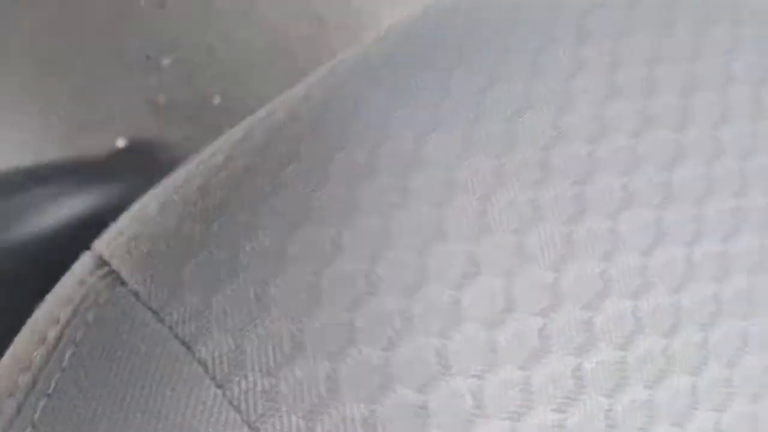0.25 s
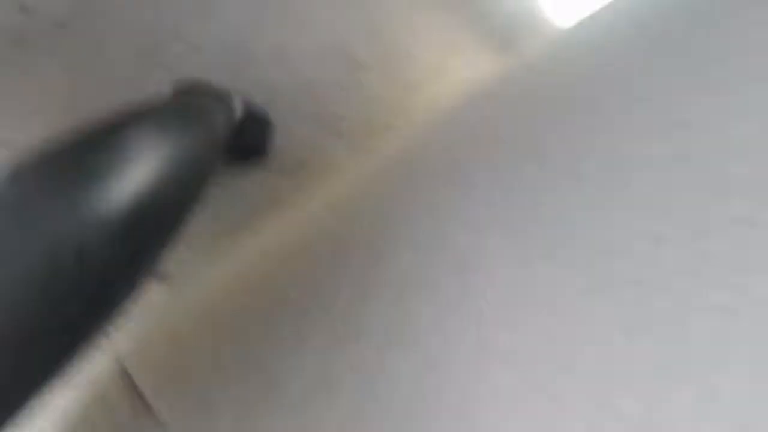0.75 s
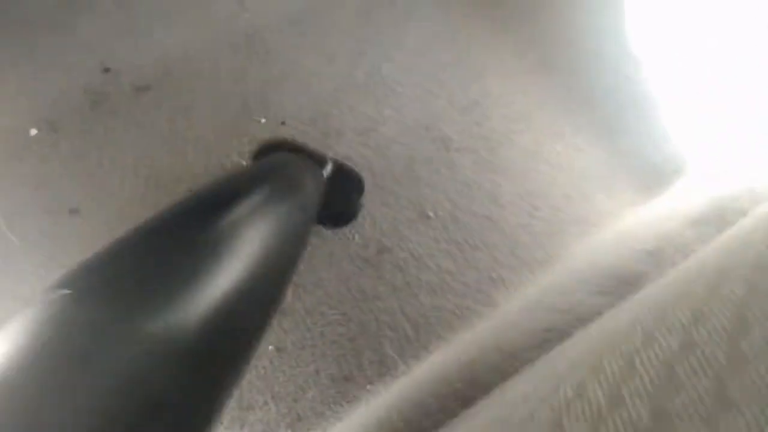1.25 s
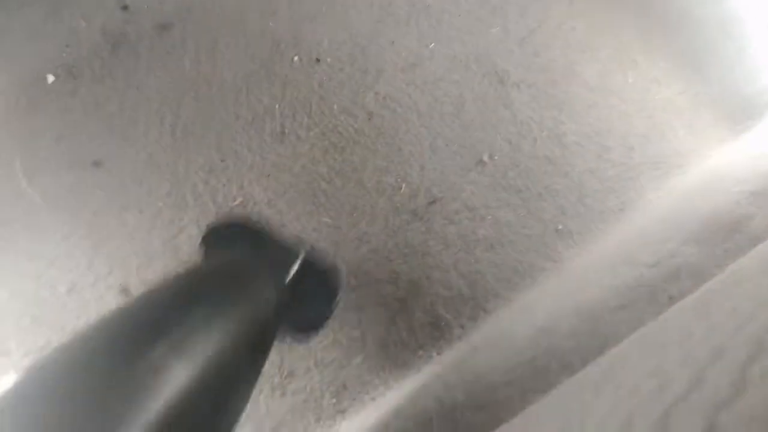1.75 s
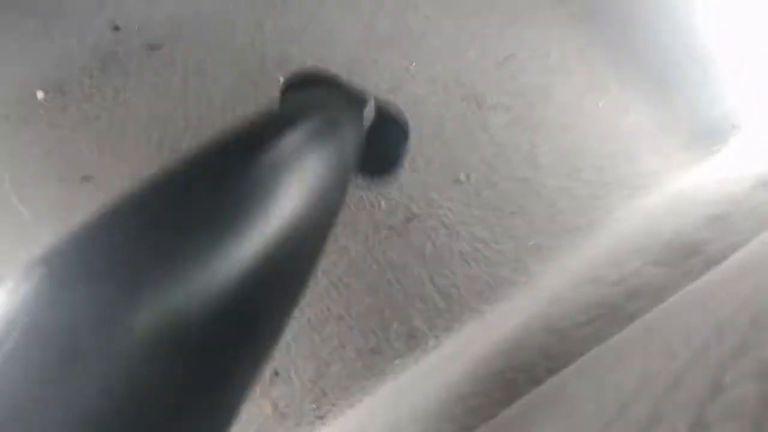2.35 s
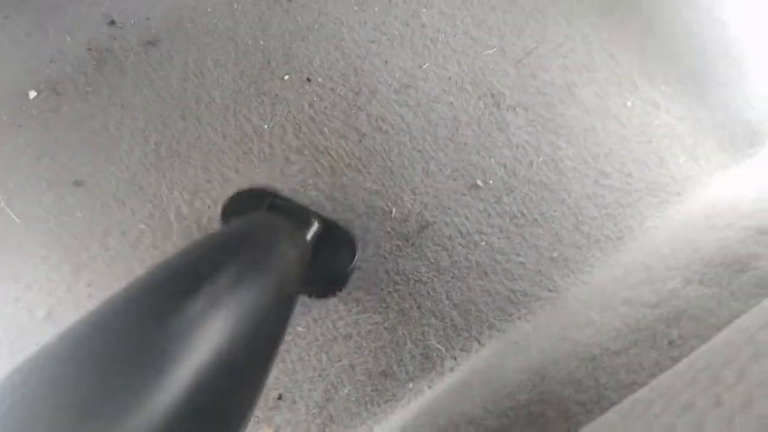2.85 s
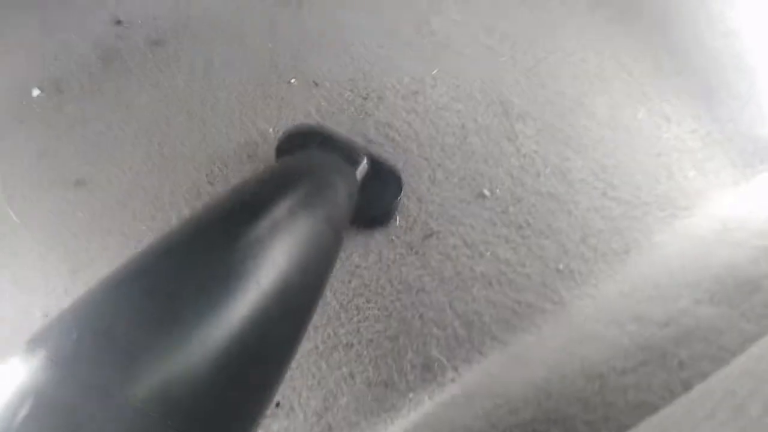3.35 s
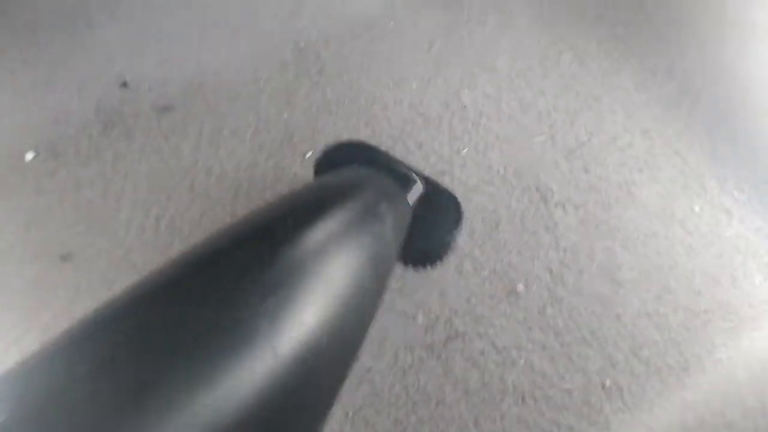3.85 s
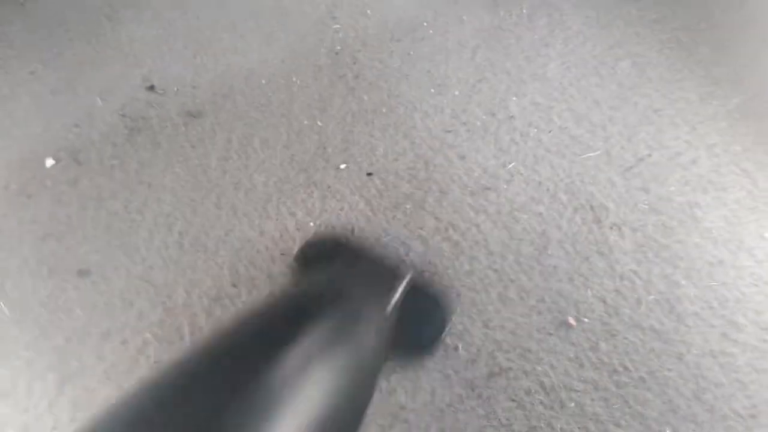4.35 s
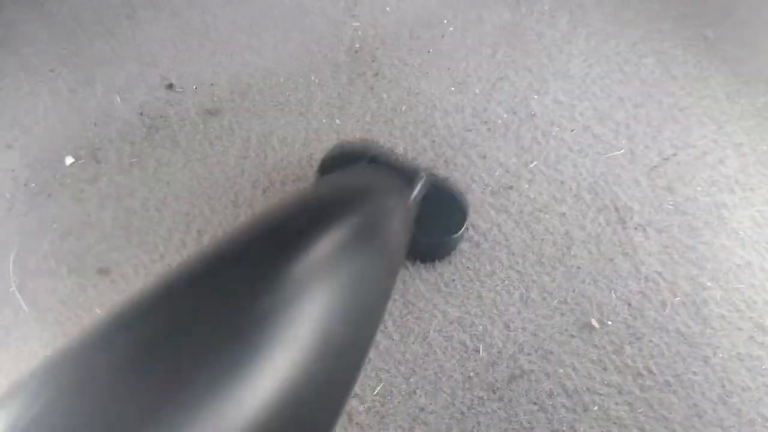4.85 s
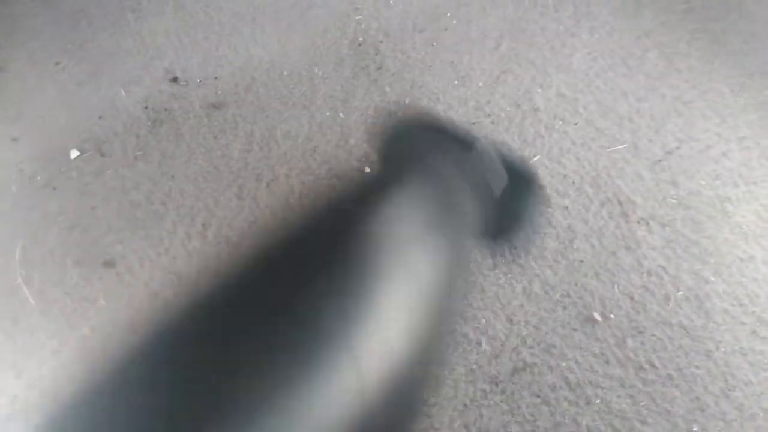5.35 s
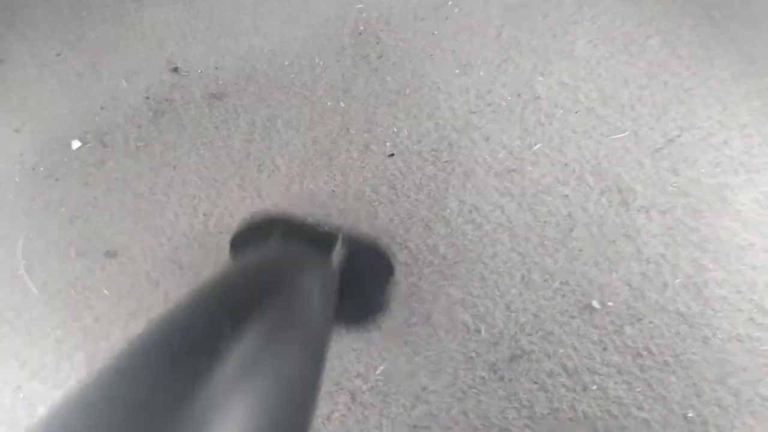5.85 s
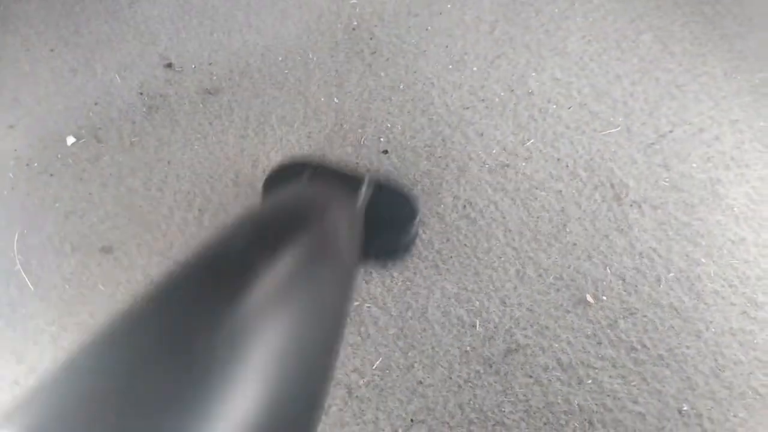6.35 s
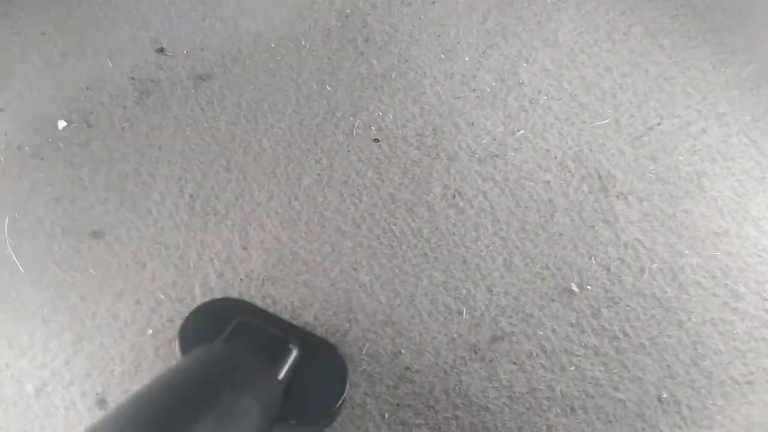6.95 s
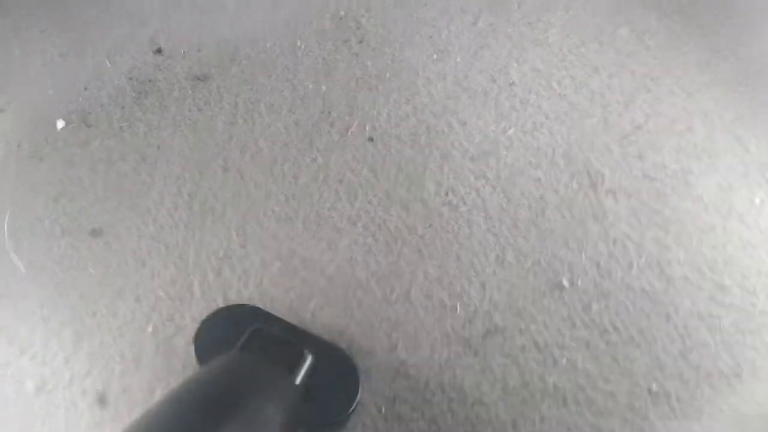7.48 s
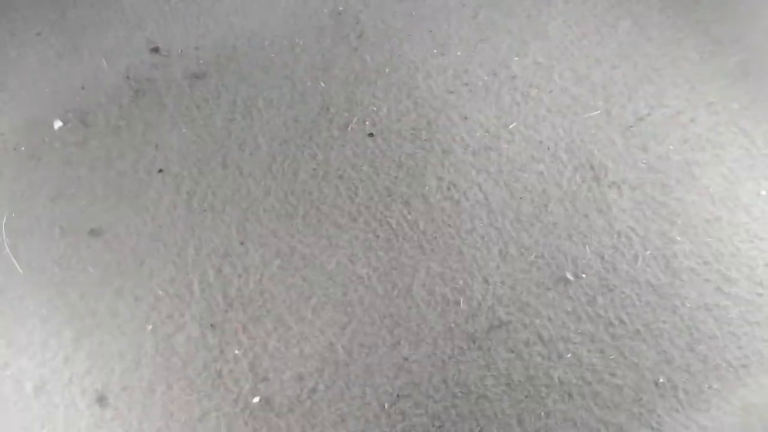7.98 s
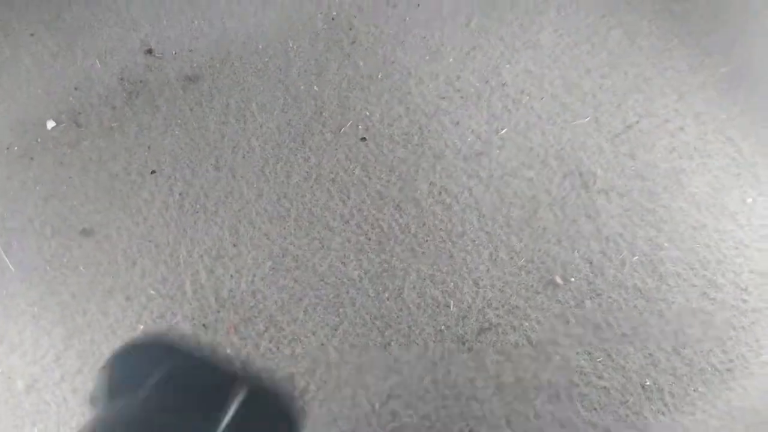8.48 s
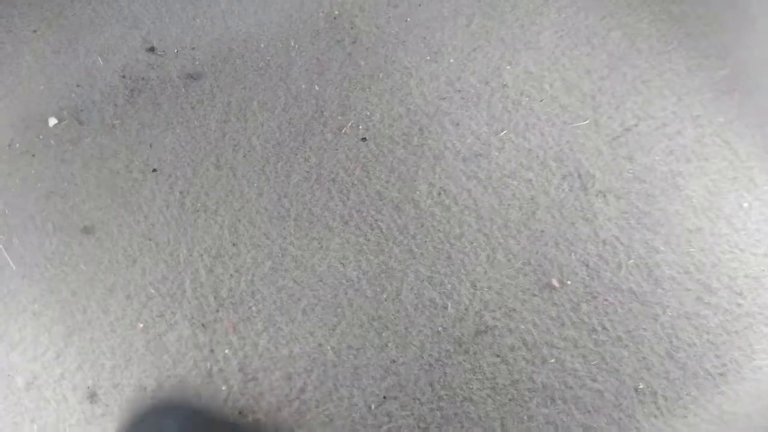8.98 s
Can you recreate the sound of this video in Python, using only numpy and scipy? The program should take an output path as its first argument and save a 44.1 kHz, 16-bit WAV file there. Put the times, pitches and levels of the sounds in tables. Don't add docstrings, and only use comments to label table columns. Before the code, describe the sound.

A cordless hand vacuum runs throughout inside a car, heard very close in stereo. Its steady mid-pitched motor whine sits over roaring, hissing air. A brush drags over carpet in patchy low rumbles, and the nozzle thuds softly against the floor at stroke turns. Early on, a hand shifts on the phone and gives its case one dull, low tap; later rubbing is faint.

```python
import sys
import numpy as np
from scipy import signal
from scipy.fft import rfft, irfft, next_fast_len
from scipy.io import wavfile
from scipy.ndimage import uniform_filter1d

SR = 44100
rng = np.random.default_rng(int(sys.argv[2]) if len(sys.argv) > 2 else 0)


def volts_from_db(level):
    exponent = np.asarray(level, float) / 20
    return 10 ** exponent


def unload_audio(sound):
    columns = np.transpose(np.atleast_2d(sound))
    steps = np.round(np.clip(columns, -1, 1) * 32767)
    wavfile.write(sys.argv[1], SR, steps.astype(np.int16))


N = 406602
TIME = np.arange(N) / SR
SIZE = next_fast_len(N)
FREQ = np.arange(SIZE // 2 + 1) * SR / SIZE

# (t/s, exhaust buffet/dB, duct roar/dB, nozzle roar/dB, hiss/dB)
AIR_SWELL = [(0.0, -1, -2.5, -1, 2.2), (0.25, 1.5, 0, -0.8, 0.8), (0.45, 1.5, -2, 0, 2),
             (0.65, -1, 1.2, 0, 1), (0.85, 1, -1.5, -0.7, 1), (1.05, 1.5, 0, 0, 2.7),
             (1.25, -0.5, 0, -1.5, 0.5), (1.45, -1, 0, -3.5, -3), (1.65, -1, -1.5, -2, -1.5),
             (1.85, 0.5, 0.5, 0.5, 1), (2.05, -1, 0, 0.8, -1), (2.24, 2.5, 1, -0.5, 2.5),
             (2.44, -4, 0, -2.5, -2.5), (2.64, -1, -1.5, -2, -1.3), (2.84, -4, -1.5, 0.8, -2.2),
             (3.04, -1, 2, -2.5, -0.8), (3.24, -2, -2, 0.5, -2), (3.44, 0.5, -2.5, -1, -2),
             (3.64, -4, -1, 1, -0.0), (3.84, -1.7, 0.7, -2, -0.5), (4.04, 0, -0.5, 1, -2),
             (4.24, -1.5, -0.5, -0.5, 0.2), (4.44, 0.8, -2.3, -0.5, -0.5), (4.64, -0.2, 1, -0.8, 2.5),
             (4.84, -3, 2, -1.5, 0.5), (5.04, 2.5, -2.5, 1, 0.5), (5.24, 0, 2.5, -1, 1.5),
             (5.44, -1.5, 2, 0.2, 1.7), (5.64, -1.4, -3, -0.7, -2.5), (5.84, 0.5, 0.7, 2, 1),
             (6.04, 0, -1, 0, 0.5), (6.24, -2.5, 1.7, 1.5, 0), (6.44, 0.2, 0.5, 0.5, -1),
             (6.63, 4.5, -1.3, 2.5, 1.7), (6.83, 2.3, -2.5, 0.4, 1.7), (7.03, 0, -2.5, -0.7, -0.5),
             (7.23, 1.5, 1, 0, 2), (7.43, 2.5, -0.5, 0, 0.5), (7.63, 1, -0.7, 0, 0),
             (7.83, 2, 0.7, -0.5, -3.5), (8.03, -1, -0.7, -1.5, -3.1), (8.23, 1.0, -2.5, -1, -4.7),
             (8.43, -1, -1, 4.5, -5.5), (8.63, 1, 2, -0.5, -2.6), (8.83, 2, -1.5, -1, -3),
             (9.03, 0, 0, 1.5, -4)]


def walk(rate):
    hold = int(SR / rate)
    steps = np.repeat(rng.standard_normal(N // hold + 1), hold)
    return 1.3 * uniform_filter1d(uniform_filter1d(steps, hold), hold)[:N]


def curves(table):
    s, *columns = np.transpose(table)
    return [np.interp(TIME, s, column) for column in columns]


def over_hz(table):
    hz, *columns = np.transpose(table)
    return np.array([np.interp(np.log(FREQ + 1), np.log(hz), column) for column in columns])


def noise(count):
    return rfft(rng.standard_normal((count, SIZE))) * np.sqrt(SR / 2)


def tones(table, turn):
    for multiple, left_db, right_db, lead in table:
        phase = multiple * turn + 2 * np.pi * rng.random()
        left = volts_from_db(left_db) * np.sin(phase + lead)
        right = volts_from_db(right_db) * np.sin(phase)
        yield np.sqrt(2) * np.array([left, right])


def motor(turn, hiss_db, left_db, right_db, *order_db):
    # (multiple of shaft, left/dB, right/dB, left leads/rad)
    driven = [
        (3, -9, -3, 0.82),
        (4, 0.5, -2.5, 2.51),
        (9, 0, -3.5, 2.81),
    ]
    fading = [(2, -48, -48, -0.4), (5, -42, -44, -2), (6, -45, -45, -0.5), (7, -64.5, -57, .01),
              (8, -45, -47.5, 1.8), (10, -70, -68, -1), (11, -63, -63, -1), (12, -55, -51.5, 1.8)]
    exhaust = [(14.97, -58, -66, -1), (17.1, -63, -64, 1.8), (18.03, -55.5, -64.5, 3),
               (19.9, -62, -74, -0.5), (21, -62, -70, .6), (24, -57, -73, -1.5)]
    bearing = [(1.619, -45.5, -49.5, -0.26), (2.62, -44.5, -47.5, 0.33), (2.93, -45.5, -39.5, 0.96),
               (3.237, -56, -56, 1.2), (5.77, -48.5, -51, -1.15)]

    left = volts_from_db(left_db) * np.sin(turn - 0.52)
    right = volts_from_db(right_db) * np.sin(turn)
    out = np.sqrt(2) * np.array([left, right]) * volts_from_db(0.5 * walk(30))
    for pair, db in zip(tones(driven, turn), order_db):
        out += pair * volts_from_db(db + 1.06 * walk(30))
    for pair in tones(fading, turn):
        out += pair * volts_from_db(2.23 * walk(3.008) + 2.0 * walk(25))
    for pair in tones(exhaust, turn):
        out += pair * volts_from_db(hiss_db + 3.9 * walk(2.51) + 3.4 * walk(40))
    slip = turn + np.cumsum(1.506 * walk(30)) * 2 * np.pi / SR
    for pair in tones(bearing, slip):
        out += pair * volts_from_db(2.5 * walk(20))
    return out


def air(turn, blade_db):
    swell_hz = [280, 1400, 2700, 9500]
    # (f/Hz, left/dB per Hz, right/dB per Hz)
    colour = [(40, -85, -86), (90.5, -77.5, -77.5), (408, -60.5, -76.5), (600, -67.5, -73),
              (910, -69.5, -71.5), (1306, -65, -62.5), (2346, -59.5, -63), (3076, -75.5, -81),
              (3790, -66.5, -69.5), (4650, -86, -88), (6530, -86, -89), (6900, -82, -83),
              (10700, -78, -89.5), (13900, -83, -97)]
    # (f/Hz, width/Hz, level/dB)
    duct = [(1252, 90, 6), (1403, 67, 6.5), (1750, 350, 1.5), (2870, 120, 9.5), (3370, 230, 3),
            (4380, 240, 4.5), (5200, 150, 10), (6100, 120, -10), (6030, 250, 1), (13100, 500, -1)]
    # (f/Hz, common share/0-1)
    alike = [(60, 0.43), (300, 0.36), (600, .85), (1000, 1), (1500, 0.78), (2100, 1), (2900, 0.75),
             (4200, 0.87), (6400, 0.94), (7500, 0.25), (9000, 0.2), (14000, .05)]
    port_lag_s, port_turn_hz = 0.0004605, 445

    common, left, right = noise(count=3)
    share = np.sqrt(np.clip(over_hz(alike)[0], 0, 1))
    own = np.sqrt(1 - share ** 2)
    lead = 2 * np.pi * FREQ * port_lag_s - np.pi * (1 - np.exp(-FREQ / port_turn_hz))
    near = share * common + own * left
    far = share * common * np.exp(-1j * lead) + own * right
    resonance = sum(db / (1 + (2 * (FREQ - hz) / width) ** 2) for hz, width, db in duct)
    ports = np.array([near, far]) * volts_from_db(over_hz(colour) + resonance)

    swell = np.array(curves(AIR_SWELL))
    half_octave = np.log2(FREQ + 1) * 2
    out = 0
    for band in range(9, 29):
        window = np.cos(np.pi / 2 * np.clip(half_octave - band, -1, 1))
        weight = [np.interp(band / 2, np.log2(swell_hz), row) for row in np.eye(len(swell_hz))]
        masked = 0.5 * (band == 25) * (blade_db + 36)
        level = volts_from_db(weight @ swell - masked + 1.7 * walk(7))
        out = out + irfft(ports * window ** 2, SIZE)[:, :N] * level
    return out * (1 + 0.12 * np.cos(turn))


def brush():
    # (t/s, level/dB)
    scrub = [(0.0, -59), (0.15, -58), (0.3, -37), (0.45, -53), (0.6, -55), (0.75, -51), (0.9, -38),
             (1.05, -52), (1.2, -56), (1.35, -53), (1.5, -43), (1.65, -49), (1.8, -56), (1.95, -55),
             (2.1, -48), (2.24, -57), (2.39, -54), (2.54, -53), (2.69, -46), (2.84, -44), (2.99, -53),
             (3.14, -50), (3.29, -47), (3.44, -54), (3.59, -33), (3.74, -55), (3.89, -56), (4.04, -51),
             (4.19, -52), (4.34, -47.5), (4.49, -44), (4.64, -52), (4.79, -53), (4.94, -40), (5.09, -45),
             (5.24, -50), (5.39, -52), (5.54, -51), (5.69, -49), (5.84, -47), (5.99, -57), (6.14, -51),
             (6.29, -59), (6.44, -45), (6.59, -42), (6.73, -41), (6.88, -46), (7.03, -55), (7.18, -57),
             (7.33, -46), (7.48, -45), (7.63, -48), (7.78, -46), (7.93, -44), (8.08, -46), (8.23, -48),
             (8.38, -58), (8.53, -55), (8.68, -49), (8.83, -51), (8.98, -51), (9.13, -47)]
    # (f/Hz, level/dB)
    pile = [(40, -10), (90, 2), (160, 1), (280, 13.5), (400, -3), (700, -6), (1200, -21)]

    rumble = irfft(noise(count=2) * volts_from_db(over_hz(pile)), SIZE)[:, :N]
    rumble = (rumble + 0.67 * rumble[::-1]) / rumble.std()
    patchy = volts_from_db(curves(scrub)[0] - 5.0 + 3.6 * walk(25))
    return rumble * patchy * volts_from_db(np.array([[2.5], [0]]))


def knocks():
    # (t/s, peak/dB)
    landings = [(0.229, -34), (0.726, -35), (0.869, -47), (1.383, -39), (2.004, -45), (2.607, -35),
                (3.33, -38), (4.887, -29), (5.554, -32), (6.349, -29), (6.864, -42), (7.281, -30),
                (8.082, -46), (8.653, -39)]
    # (f/Hz, level/dB, t60/s)
    pan = [
        (62.4, -12, 0.094),
        (90.6, 3.5, 0.14),
        (133, 2, 0.096),
        (290, 7, 0.057),
        (730, -5, 0.051),
    ]

    out = np.zeros(N + SR)
    t = TIME[:SR // 4]
    soft_start = 1 - np.exp(-(t / 0.0064) ** 2)
    chance = rng.standard_normal((len(landings), len(pan)))
    for (s, peak_db), row in zip(landings, chance):
        ring = np.zeros(len(t))
        for (hz, db, t60), luck in zip(pan, row):
            ring += volts_from_db(db + 2.3 * luck) * np.sin(2 * np.pi * hz * t) * volts_from_db(-60 * t / t60)
        ring *= soft_start
        out[int(s * SR):][:len(t)] += volts_from_db(peak_db + 3.5) * ring / np.abs(ring).max()
    return out[:N] * volts_from_db(np.array([[-0.6], [0.6]]))


def grip():
    # (t/s, rumble/dB)
    rubbing = [(0, -62), (.17, -58), (.21, -42), (.3, -43), (.33, -38), (.4, -47), (.44, -64), (.6, -48),
               (.7, -52), (.8, -58), (.88, -47), (1.05, -56), (1.2, -60), (1.4, -57), (1.6, -67),
               (3.2, -65), (3.36, -54), (3.5, -67), (4.8, -63), (4.9, -54), (5.1, -67), (5.6, -58),
               (5.85, -62), (6.08, -54), (6.2, -62), (6.4, -58), (6.55, -62), (6.78, -53), (6.95, -54),
               (7.05, -60), (7.9, -65), (8.15, -57), (8.5, -65), (8.75, -61), (9.2, -62)]
    # t/s, peak/dB, f/Hz, half length/s
    jolt = (.3465, -8, 105, -0.03)

    case_tone = np.exp(-np.log((FREQ + 1) / 75) ** 2 / 0.5 ** 1.1)
    rumble = irfft(noise(count=1)[0] * case_tone, SIZE)[:N]
    s, db, hz, half = jolt
    swing = np.cos(2 * np.pi * hz * (TIME - s) - 0.3)
    tap = volts_from_db(db) * np.exp(-((TIME - s) / half) ** 2) * swing
    shake = tap + rumble / rumble.std() * volts_from_db(curves(rubbing)[0] + 2.2 * walk(30))
    return shake * np.array([[-1], [1]])


def scene():
    # (t/s, f/Hz)
    shaft = [(0.0, 477), (0.75, 475.2), (1.45, 475.5), (2.15, 475.5), (2.84, 475.6), (3.54, 475.2),
             (4.24, 475.1), (4.94, 473.8), (5.64, 473.4), (6.34, 472.8), (7.03, 472.9), (7.73, 472),
             (8.43, 472.8), (9.13, 471.3), (9.13, 474)]
    # (t/s, shaft left/dB, shaft right/dB, 3rd order/dB, 4th order/dB, blade tone/dB)
    whine = [(0.0, -20.5, -45, -58, -36, -32), (0.15, -19, -33.5, -46, -41, -36),
             (0.25, -21.5, -36.2, -46, -34, -38), (0.35, -20.5, -42.5, -51, -30, -33),
             (0.45, -21.5, -54, -53, -28, -39), (0.55, -19.4, -47, -50, -38.0, -28.5),
             (0.65, -18.5, -31, -41, -37, -39.0), (0.75, -21.3, -32.4, -49, -32, -42.0),
             (0.85, -20.5, -32.1, -44, -34.0, -33), (0.95, -20.3, -31.3, -44, -27.5, -40),
             (1.05, -20.5, -32, -46, -30.0, -39.0), (1.15, -18, -28.1, -28, -32.0, -41),
             (1.25, -17.5, -26, -34, -38, -43), (1.35, -19.5, -26.1, -32.5, -29.0, -49),
             (1.45, -19, -25, -28, -32, -55), (1.55, -20.5, -26.8, -31, -28.0, -47),
             (1.65, -20.5, -27.2, -36, -29, -42), (1.75, -18.5, -26, -36.0, -31.0, -31),
             (1.85, -18, -26, -33, -39, -29), (1.95, -18.7, -26.8, -31, -33.0, -31),
             (2.05, -18, -25, -33, -29.0, -36), (2.15, -19.0, -27, -36, -38, -30),
             (2.24, -18.6, -27.8, -30, -35.0, -25), (2.34, -17.5, -25.5, -30, -36.0, -32),
             (2.44, -17.5, -24, -31, -33.0, -46), (2.54, -18, -24, -31, -29.0, -36),
             (2.64, -20.3, -26.6, -50, -32, -38), (2.74, -19.5, -25, -30, -29, -32),
             (2.84, -19.5, -27.2, -35.0, -28.0, -40), (2.94, -20.4, -27.0, -39, -33, -40),
             (3.04, -16.5, -23.5, -35.0, -32, -38), (3.14, -20, -26.1, -35.0, -28.0, -32),
             (3.24, -20.5, -26.4, -40, -35, -35), (3.34, -18, -23.5, -37, -32, -34),
             (3.44, -20, -28.5, -40, -33, -44.0), (3.54, -19.5, -24.5, -29, -25.5, -40.0),
             (3.64, -19.9, -27.5, -37, -29, -31), (3.74, -18, -24, -33, -28, -33),
             (3.84, -19, -25.3, -32, -29.0, -33), (3.94, -18.5, -24, -42, -30.0, -28.5),
             (4.04, -18.5, -25, -45, -30, -25.5), (4.14, -19.8, -29, -41.0, -33, -26.5),
             (4.24, -19.5, -27, -34, -28, -28), (4.34, -20.0, -26.9, -34.0, -31, -28),
             (4.44, -19.5, -26.3, -32, -30.0, -34), (4.54, -19.8, -25.6, -34, -28, -34),
             (4.64, -17.5, -23, -33, -27.5, -29), (4.74, -19.1, -24.9, -34, -29, -28),
             (4.84, -21, -28, -37, -25, -35), (4.94, -18.5, -26.1, -38, -27, -26.5),
             (5.04, -20.1, -25, -32, -28, -33), (5.14, -18.5, -25.4, -33, -28.0, -29),
             (5.24, -20.5, -25.7, -36, -27, -33), (5.34, -19, -24.5, -28, -29, -30),
             (5.44, -18.5, -24, -33, -25.5, -29.5), (5.54, -19, -26.5, -38, -28.0, -27),
             (5.64, -22, -30, -41, -29, -29), (5.74, -19.5, -26.2, -33, -26.5, -32),
             (5.84, -19.5, -25.3, -31, -30, -30), (5.94, -20, -26.7, -41, -31.0, -31),
             (6.04, -19.5, -26.4, -37, -28, -31), (6.14, -19.8, -26, -35, -31, -33),
             (6.24, -18.5, -25, -38.0, -33, -29), (6.34, -20.0, -27, -37.0, -31.0, -30),
             (6.44, -20.5, -26.5, -42, -29.0, -31), (6.54, -20.3, -26.9, -28, -26, -34),
             (6.63, -17.5, -24.9, -29, -28, -33), (6.73, -19.3, -26, -29.5, -29, -32.0),
             (6.83, -19.1, -26, -27.5, -28.0, -31.0), (6.93, -19.1, -25.4, -30, -27, -33.0),
             (7.03, -19.5, -27, -32, -26.5, -33.0), (7.13, -19, -26.2, -31, -30, -35.0),
             (7.23, -17.5, -24.4, -30, -29.0, -34), (7.33, -19.2, -26, -29, -28, -31),
             (7.43, -18.5, -25.0, -28, -28, -30.5), (7.53, -18.8, -24.5, -26.5, -27, -32),
             (7.63, -18.5, -25.1, -27, -26.5, -36), (7.73, -19.2, -26, -24.5, -25.0, -39),
             (7.83, -19.8, -26, -27, -26.0, -36), (7.93, -19.4, -27, -28, -25.0, -35),
             (8.03, -19.5, -26.1, -27, -25, -32.0), (8.13, -19.9, -28, -29, -24, -32),
             (8.23, -19.5, -26, -35, -24, -32), (8.33, -21.2, -28.3, -33.0, -27.5, -33.0),
             (8.43, -19.5, -27.1, -26, -29, -31), (8.53, -18.5, -25.5, -30, -34, -36),
             (8.63, -19, -25.6, -25, -26, -39), (8.73, -19.8, -27, -35.0, -26.0, -34),
             (8.83, -19.5, -26.5, -27, -24.5, -31), (8.93, -19, -25.9, -28, -23, -37),
             (9.03, -21, -26.5, -33, -27, -32), (9.13, -17.5, -24.4, -26, -31, -36)]

    turn = np.cumsum(curves(shaft)[0] + 0.399 * walk(8)) * 2 * np.pi / SR
    levels = curves(whine)
    hiss_db = curves(AIR_SWELL)[-1]
    machine = motor(turn, hiss_db, *levels) + air(turn, levels[-1])
    return machine + brush() + knocks() + grip()


def roll_off(x):
    return signal.sosfilt(signal.butter(12, 14340, fs=SR, output="sos"), x)


def record(dry):
    bass_cut = signal.butter(2, 55, "high", fs=SR, output="sos")
    mix = signal.sosfilt(bass_cut, dry)
    return roll_off(mix)


dry = scene()
out = record(dry)
unload_audio(out)
```